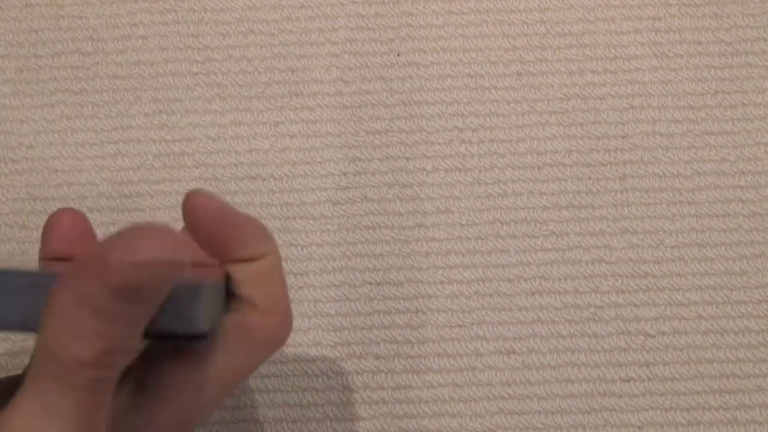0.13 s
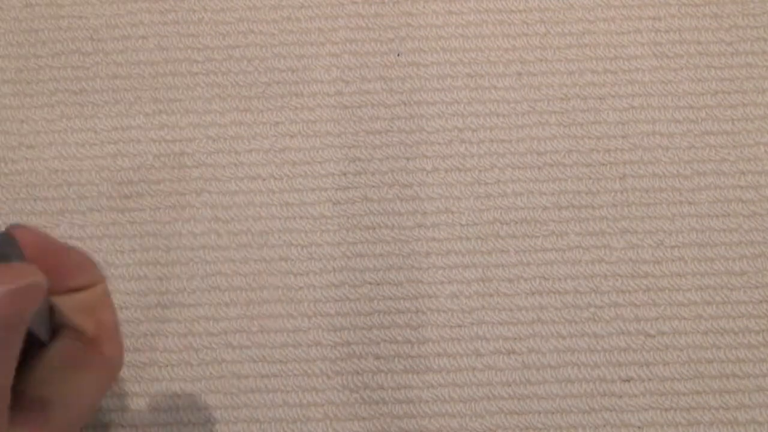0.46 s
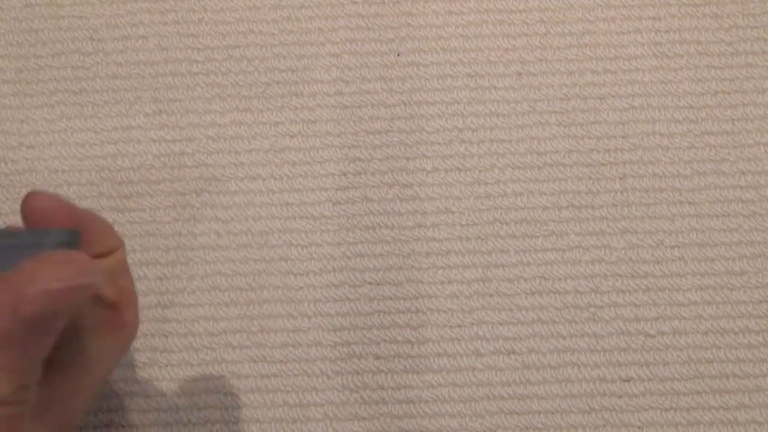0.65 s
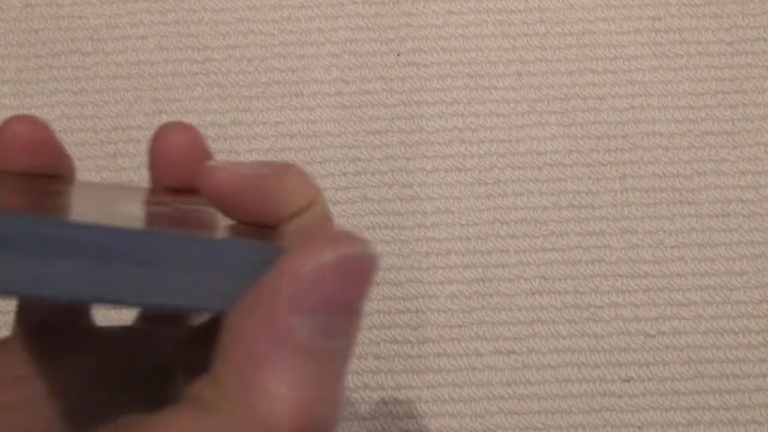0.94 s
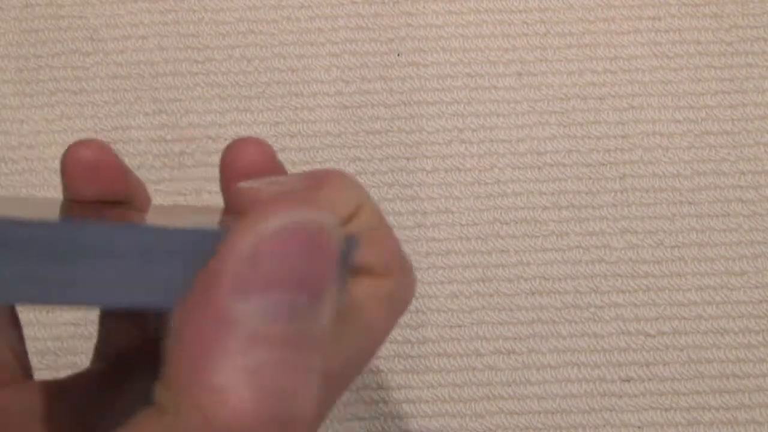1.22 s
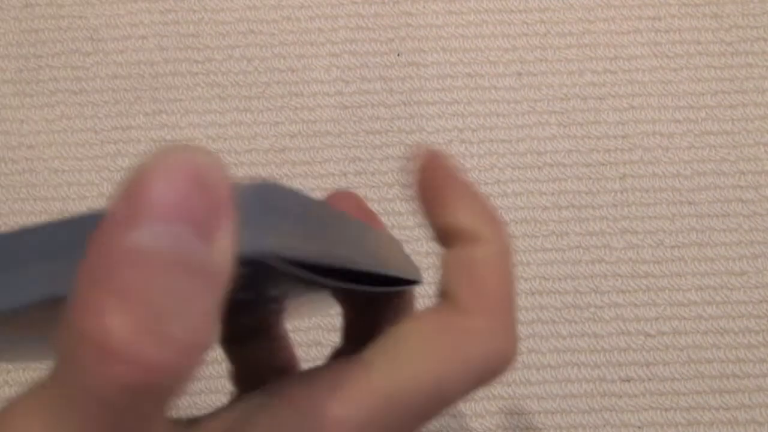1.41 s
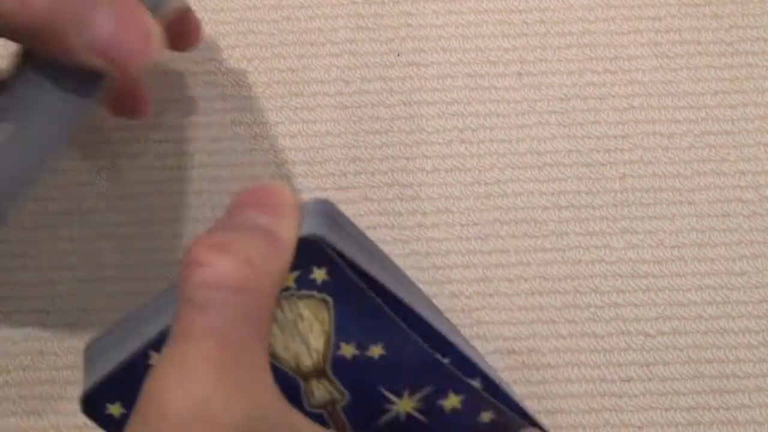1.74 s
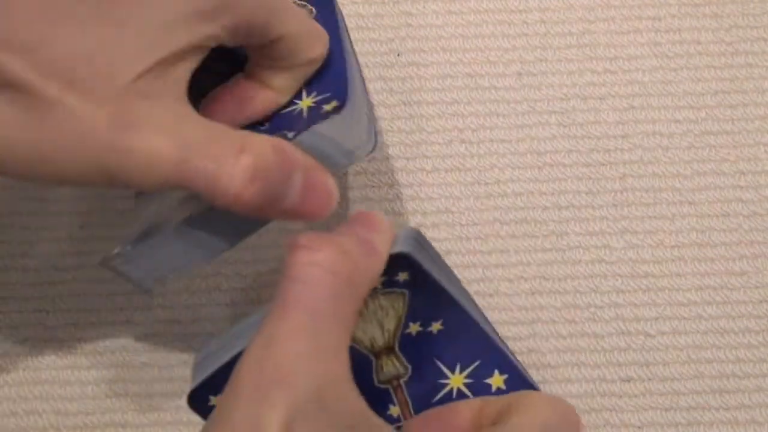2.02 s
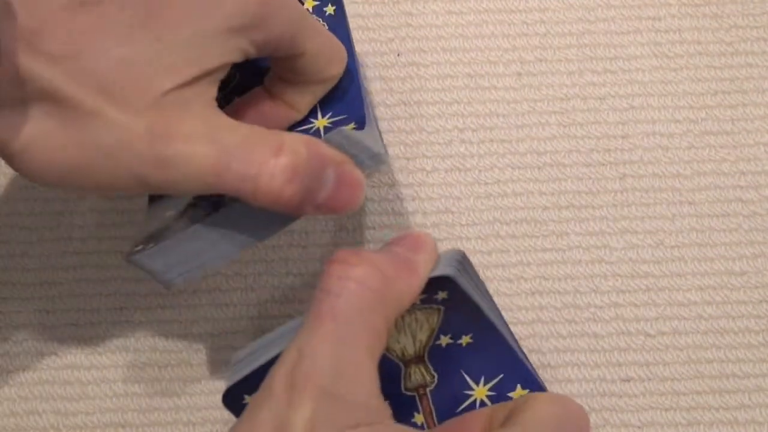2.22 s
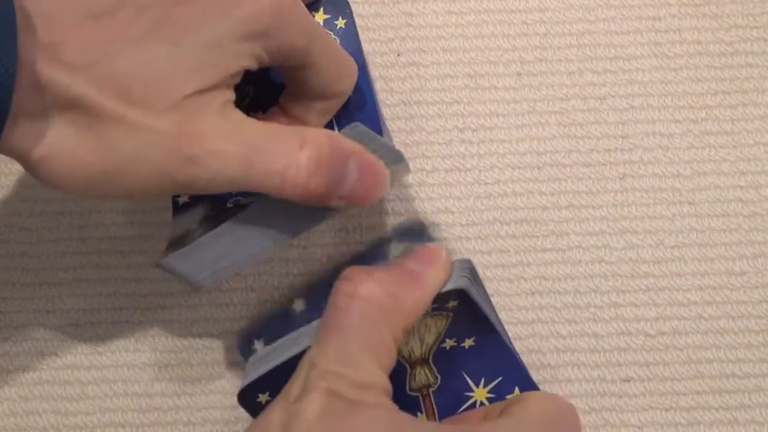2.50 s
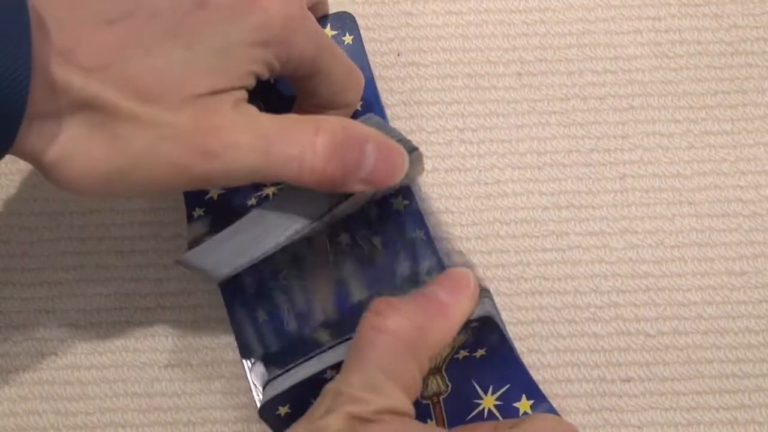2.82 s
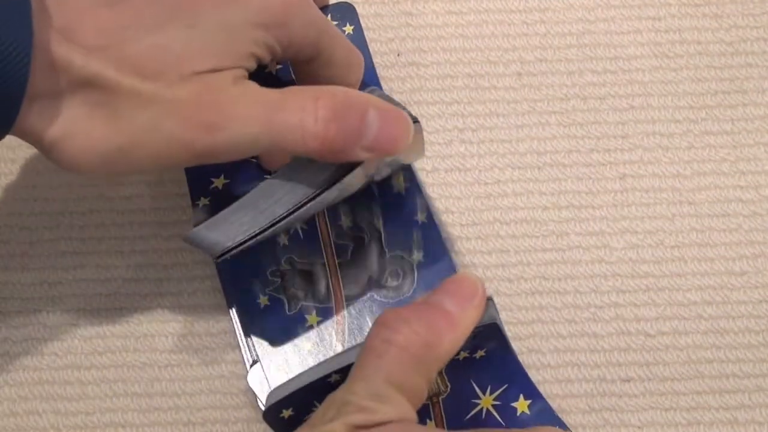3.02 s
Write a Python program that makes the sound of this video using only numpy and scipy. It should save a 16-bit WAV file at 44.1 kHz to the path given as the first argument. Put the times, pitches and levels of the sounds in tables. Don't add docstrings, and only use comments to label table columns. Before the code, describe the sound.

A deck of playing cards is softly rubbed and tapped close to a small camera, then riffled in loud, crisp, uneven snaps, over faint hum, hiss and lens whirr in a small soft room.

```python
import sys
import numpy as np
from scipy import signal
from scipy.fft import rfft, irfft
from scipy.io import wavfile

SR = 44100
rng = np.random.default_rng(int(sys.argv[2]) if len(sys.argv) > 2 else 0)


def convert_level_to_amplitude(level_db):
    exponent = np.asarray(level_db, float) / 20
    return 10 ** exponent


def inscribe(sig):
    pcm = np.round(np.clip(np.atleast_2d(sig).T, -1, 1) * 32767)
    wavfile.write(sys.argv[1], SR, pcm.astype(np.int16))


N = 138915
T = np.arange(N) / SR


def rms_one(x):
    return x / np.sqrt(np.mean(x ** 2) + 1e-20)


def curve(rows):
    s, db = np.transpose(rows)
    return np.interp(T, s, db)


def colour(x, points):
    size = 4096
    hz, db = np.transpose(points)
    bin_hz = np.arange(size // 2 + 1) * SR / size
    log_gain = np.interp(np.log(bin_hz + 1), np.log(hz), db) * np.log(10) / 20
    cepstrum = irfft(log_gain)
    cepstrum[1:size // 2] *= 2
    cepstrum[size // 2 + 1:] = 0
    response = irfft(np.exp(rfft(cepstrum)))
    return signal.fftconvolve(x, response / np.sqrt(np.sum(response ** 2)))[:len(x)]


def peak(x, hz, width):
    r = np.exp(-np.pi * width / SR)
    poles = [1, -2 * r * np.cos(2 * np.pi * hz / SR), r * r]
    return signal.lfilter([(1 - r * r) / 2, 0, (r * r - 1) / 2], poles, x)


def ring(x, hz, t60):
    r, w = convert_level_to_amplitude(-60 / (t60 * SR)), 2 * np.pi * hz / SR
    return signal.lfilter([0, np.sin(w)], [1, -2 * r * np.cos(w), r * r], x)


def drift(rate):
    steps = rng.standard_normal(2000)
    return np.interp(T * rate * 2, np.arange(len(steps)), steps)


def grit(rough_db):
    unevenness_db = rough_db * drift(250) + 1.5 * drift(25)
    return rms_one(rng.standard_normal(N) * convert_level_to_amplitude(unevenness_db))


def ease_db():
    return -3 * np.clip((T - 2) / 0.018, 0, 1)


def air():
    # frequency in Hz, level in dB per Hz.
    hum_colour = [(15, -36), (25, -6), (161, 0), (381, -7.5), (999, -14.5), (2100, -12.5), (2700, -15),
                  (4200, -17)]
    hum_db, hiss_db = -58, -64
    hum = colour(rng.standard_normal(N), list(hum_colour) + [(6000, -30)]) * convert_level_to_amplitude(hum_db + .8 * drift(6))
    hiss = colour(rng.standard_normal(N), [(3000, 30), (6000, 2.5), (16000, 0)])
    return hum + convert_level_to_amplitude(hiss_db) * hiss


def lens_drive():
    # centre in Hz, width in Hz, level in dB.
    whirr_bands = [(4700, 900, -2), (5100, 700, -2), (5420, 500, -1)]
    # frequency in Hz, level in dB, t60 in seconds.
    tick_modes = [(3110, 0, .018), (3600, -4, .008), (5300, -6, .008)]
    whirr_db, whirr_top_hz = -58.5, 5900
    tick_db, tick_start_s, tick_period_s, wake_s = -48, 1.541, .04, .12

    white = rng.standard_normal(N) * convert_level_to_amplitude(0.73 * drift(30))
    whirr = np.zeros(N)
    for hz, width, db in whirr_bands:
        shifted = np.roll(white, int(hz))
        whirr += convert_level_to_amplitude(db) * peak(peak(shifted, hz, width), hz, width)
    whirr = signal.sosfilt(signal.butter(8, whirr_top_hz, fs=SR, output="sos"), rms_one(whirr))

    starts = np.arange(tick_start_s, T[-1] - .01, tick_period_s)
    wake = np.clip(.4 + (starts - starts[0]) / wake_s, 0, 1)
    ticks = np.zeros(N)
    for hz, db, t60 in tick_modes:
        clicks = np.full(N, 1e-18)
        late, uneven = rng.standard_normal((2, len(starts)))
        places = ((starts + .001 * np.abs(late)) * SR).astype(int)
        clicks[places] = convert_level_to_amplitude(tick_db + db + 1.5 * uneven) * wake
        ticks += ring(clicks, hz, t60)
    return convert_level_to_amplitude(whirr_db + ease_db()) * whirr + ticks


def rubs():
    # start in seconds, length in seconds, level in dB, centre in Hz.
    strokes = [(0.025, 0.044, -53, 3530), (0.245, 0.0053, -61, 9000), (0.285, 0.0064, -62, 9000),
               (0.46, 0.035, -57.5, 5460), (0.536, 0.033, -49, 3950), (0.62, 0.024, -52, 4560),
               (0.854, 0.032, -52.5, 4100), (0.908, 0.015, -52, 4800), (0.936, 0.018, -46, 3100),
               (1.117, 0.053, -58, 4140), (1.234, 0.031, -58, 3970), (1.302, 0.085, -58, 4720),
               (1.355, 0.032, -55, 6140), (1.442, 0.0065, -54, 7200), (1.854, 0.083, -58, 9300),
               (1.913, 0.023, -50.5, 4120), (1.963, 0.069, -62, 4900)]
    # frequency in Hz, level in dB per Hz.
    stroke_colour = [(200, -16), (1000, -9), (2800, -5), (4800, 0), (6000, -9), (10000, -7), (16000, -10)]
    # time in seconds, level in dB.
    hands = [(0, -56.5), (.75, -58), (.78, -62), (1.05, -67.5), (1.2, -63), (1.5, -66), (2.0, -66),
             (2.3, -68.5)]
    # frequency in Hz, level in dB per Hz.
    rustle_colour = [(200, -18), (1000, -13), (2800, -9), (4800, 0), (6000, -8), (10000, -7), (16000, -11)]
    rise_s, fall_s, broad_db = .008, .012, -3

    broad = rms_one(colour(grit(2.0), stroke_colour))
    out = convert_level_to_amplitude(curve(hands) + 2.5) * rms_one(colour(grit(0.41), rustle_colour))
    for s, length, db, hz in strokes:
        rise = np.clip((T - s) / rise_s, 0, 1)
        fall = np.exp(-np.maximum(T - s - length, 0) / fall_s)
        pitched = rms_one(peak(grit(2.0), hz, .3 * hz))
        out += convert_level_to_amplitude(db) * rise * fall * (pitched + convert_level_to_amplitude(broad_db) * broad)
    return out


def slide():
    # start in seconds, level in dB, t60 in seconds.
    scrapes = [(2.575, -38.5, 0.13), (2.598, -32.5, 0.22), (2.619, -25.5, 0.24), (2.723, -40, 0.3),
               (2.87, -30.5, 0.26), (2.905, -29, 0.23), (2.991, -28.5, 0.4), (3.060, -33, .2),
               (3.115, -30.5, 0.22)]
    # frequency in Hz, level in dB per Hz.
    scrape_colour = [(150, -35), (250, 0.5), (2090, -5.5), (2400, -5), (3230, 0), (7570, -14),
                     (13900, -12.5), (16000, -18)]
    rise_s = 0.0086
    power = np.zeros(N)
    for s, db, t60 in scrapes:
        rise = np.clip((T - s) / rise_s, 0, 1)
        fall_db = -60 * np.maximum(T - s, 0) / t60
        power += (rise * convert_level_to_amplitude(db + fall_db)) ** 2
    return np.sqrt(power) * rms_one(colour(grit(1.1), scrape_colour))


def cards(rows, push_s, ring_db, cycles, flap_t60, thud_db):
    # frequency in Hz, level in dB per Hz.
    edge_colour = [(350, -74.5), (600, -9), (1390, -9), (2210, 2), (3340, -1), (3990, 5), (7020, -5),
                   (14100, -9.5), (16000, -10)]
    spike_s, spike_db = 0.00022, -2.5
    thud_hz, thud_t60 = 345, 0.058

    t = np.arange(4096) / SR
    out = np.zeros(N + len(t))
    for s, db, hz, crack_ms, flap_db, flap_hz in rows:
        crack_s = crack_ms / 1000
        burst, soft = rng.standard_normal((2, len(t)))
        burst = burst * (np.exp(-t / crack_s) + convert_level_to_amplitude(spike_db) * np.exp(-t / spike_s))
        burst[1] += 2.33 * np.sign(burst[1])
        crack = colour(burst, edge_colour)
        edge = ring(soft * np.exp(-t / (1.44 * crack_s)), hz, cycles / hz)
        hit = crack / np.abs(crack).max() + convert_level_to_amplitude(ring_db) * edge / np.abs(edge).max()

        push = (1 + 1.08 * soft) * np.exp(-t / push_s) * (1 - np.exp(-t / 0.00028))
        hollow = peak(push, flap_hz, 2.2 / flap_t60)
        flap = peak(hollow + .4 * push, flap_hz, 1.4 * flap_hz)
        thud = ring(push, thud_hz * rng.uniform(0.826, 1.227), thud_t60)
        low = flap / np.abs(flap).max() + convert_level_to_amplitude(thud_db) * thud / np.abs(thud).max()

        i = int(s * SR)
        out[i:i + len(t)] += convert_level_to_amplitude(db) * hit / np.abs(hit).max() + convert_level_to_amplitude(flap_db) * low
    return out[:N]


def soft_contacts(rows, **body):
    crack_ms = 1.53
    contacts = [(s, db, hz, crack_ms, flap_db, flap_hz) for s, db, hz, flap_db, flap_hz in rows]
    return cards(contacts, push_s=0.0014, **body)


def taps():
    # time in seconds, tick in dB, edge ring in Hz, flap in dB, flap pitch in Hz.
    tap_rows = [(.1111, -50, 3000, -47, 500), (.5780, -43, 4500, -64, 800), (.6170, -44, 4500, -64, 800),
                (.7055, -46, 2200, -54, 800), (.8582, -54, 1800, -44, 750), (.8650, -42, 3500, -52, 700),
                (.9088, -33, 4900, -56, 700), (.9122, -35, 4900, -60, 700), (.9175, -35, 3200, -50, 700),
                (.9290, -24, 3150, -40, 600), (.9292, -29, 4400, -50, 1800), (.9330, -29, 4300, -42, 600),
                (.9360, -31, 3150, -50, 600), (.9460, -34, 3000, -44, 600), (1.379, -40, 4800, -56, 1500),
                (1.3853, -50, 3000, -44, 1000), (1.4465, -43, 2500, -54, 400),
                (1.4990, -44, 2000, -54, 400), (1.5050, -44, 1800, -60, 900),
                (1.5080, -38, 4000, -56, 1700), (1.8363, -40, 1850, -46, 1850),
                (1.8853, -26, 4500, -40, 700), (1.8853, -31, 2500, -50, 700), (1.8853, -27, 9000, -50, 700),
                (1.8875, -32, 4900, -50, 600), (1.8910, -38, 2600, -30, 400), (1.9142, -31, 4100, -27, 600),
                (1.9165, -31, 4100, -44, 600), (1.9185, -33, 2900, -40, 700), (1.934, -42, 1900, -44, 900),
                (1.9500, -52, 2000, -40, 500)]
    return soft_contacts(tap_rows, ring_db=1.5, cycles=13.0, flap_t60=.004, thud_db=-10)


def flaps():
    # time in seconds, tick in dB, edge ring in Hz, flap in dB, flap pitch in Hz.
    flap_rows = [(2.5338, -33, 4500, -30, 870), (2.5488, -31, 5200, -35, 900),
                 (2.5601, -38, 4600, -27, 900), (2.562, -55, 1500, -24, 900),
                 (2.5645, -55, 1500, -24, 1200), (2.567, -58, 1500, -30, 750),
                 (2.5755, -50, 1500, -23.5, 750), (2.587, -50, 3900, -27, 800),
                 (2.5723, -46, 3000, -19.5, 780), (2.5845, -37, 3900, -25.5, 800),
                 (2.7013, -36, 3200, -27.5, 900), (2.708, -26, 5900, -30, 816),
                 (2.72, -28, 5400, -25.5, 604), (2.723, -30, 5330, -32.5, 493),
                 (2.7404, -26, 9950, -23.5, 564), (2.7587, -30, 2400, -21, 800),
                 (2.7775, -36, 9600, -26, 507), (2.7910, -41, 9000, -27, 800),
                 (2.8127, -33, 8900, -30, 774), (2.8278, -40, 9700, -29.5, 754),
                 (2.8484, -37, 9400, -27.5, 716), (2.8550, -27, 5950, -34, 910),
                 (2.9507, -39, 3000, -30, 700), (2.9260, -22, 3030, -38, 704),
                 (2.9724, -25, 7900, -30, 600), (3.046, -33, 2420, -25, 710), (3.095, -25, 8000, -25, 584),
                 (3.102, -21, 3010, -25, 550), (3.1400, -35, 3000, -26, 497)]
    return soft_contacts(flap_rows, ring_db=-4, cycles=12.0, flap_t60=.008, thud_db=-13)


def snaps():
    # time in seconds, peak in dB, edge ring in Hz, crack in ms.
    snap_rows = [(2.5728, -6.5, 4130, 1.4), (2.5912, -4, 3660, 0.67), (2.5944, -2.5, 5800, 1.0),
                 (2.5972, -9, 2200, 1), (2.6074, -1.5, 2980, 1.5), (2.6108, -1.5, 2560, 1.2),
                 (2.618, -7.5, 3970, 2), (2.6232, -9, 2620, 1.9), (2.6265, -11, 2500, 2.1),
                 (2.6294, -17, 2530, 2), (2.636, -9, 2550, 1.5), (2.7257, -12, 2500, 1.24),
                 (2.8587, 2, 3840, 1.45), (2.8613, 0, 2210, 1.7), (2.8645, -8, 3900, 1.5),
                 (2.8724, -14, 3950, 1.8), (2.8955, 0, 4000, 1.7), (2.8985, -9, 2300, 1.7),
                 (2.9776, -1, 4080, 1), (2.9792, -3.5, 4360, 2.1), (2.9853, 1, 3980, 1.47),
                 (3.051, -0.5, 2500, 1.7), (3.0547, -1.5, 2240, 1.6), (3.07, -15.5, 3700, 1.5),
                 (3.1104, -1, 3900, 2.1), (3.1454, -1.5, 2500, 2.1)]
    lag_s, flap_db, flap_hz = .0006, -26.5, 800
    contacts = []
    for s, db, hz, crack_ms in snap_rows:
        pitch = flap_hz * rng.uniform(1.0, 1.1)
        contacts.append((s + lag_s, db - 3.5, hz, crack_ms, db + flap_db, pitch))
    return cards(contacts, push_s=0.004, ring_db=-7, cycles=24.0, flap_t60=.0093, thud_db=-7)


def room(x):
    t60, level_db, delay_s = 0.28, -12, 0.0065
    t = T[:SR // 2]
    low, high = rng.standard_normal((2, len(t)))
    dark = peak(low, 1500, 5700) * convert_level_to_amplitude(-60 * t / t60)
    bright = 0.63 * high * convert_level_to_amplitude(-60 * t / (1.15 * t60))
    tail = (dark + bright) * (t > delay_s)
    return convert_level_to_amplitude(level_db) * signal.fftconvolve(x, tail / np.sqrt(np.sum(tail ** 2)))[:N]


def microphone(near):
    # centre in Hz, width in Hz, gain in dB.
    housing = [(2200, 300, .3), (3750, 970, -2.5), (9730, 370, 4)]
    near = near + sum((convert_level_to_amplitude(db) - 1) * peak(near, hz, width) for hz, width, db in housing)
    return signal.sosfilt(signal.butter(2, 210, "high", fs=SR, output="sos"), near)


def scene():
    hits = snaps() + flaps() + taps()
    near = microphone(hits + room(hits) + slide() + rubs())
    mid = convert_level_to_amplitude(1.0) * near + lens_drive() + convert_level_to_amplitude(ease_db()) * air()
    late = np.roll(mid, 37) - np.roll(mid, 90)
    treble = peak(peak(hits, 7400, 9000), 7400, 9000)
    side = convert_level_to_amplitude(-40) * late + convert_level_to_amplitude(-29) * treble
    return np.array([mid + side, mid - side])


def low_pass(x):
    return signal.sosfilt(signal.butter(12, 16990, fs=SR, output="sos"), x)


def record(dry):
    rounded = .8 * np.tanh(dry / .8)
    top_cut = signal.cheby2(24, 36, 16080, fs=SR, output="sos")
    return low_pass(signal.sosfilt(top_cut, rounded))


dry = scene()
out = record(dry)
inscribe(out)
```